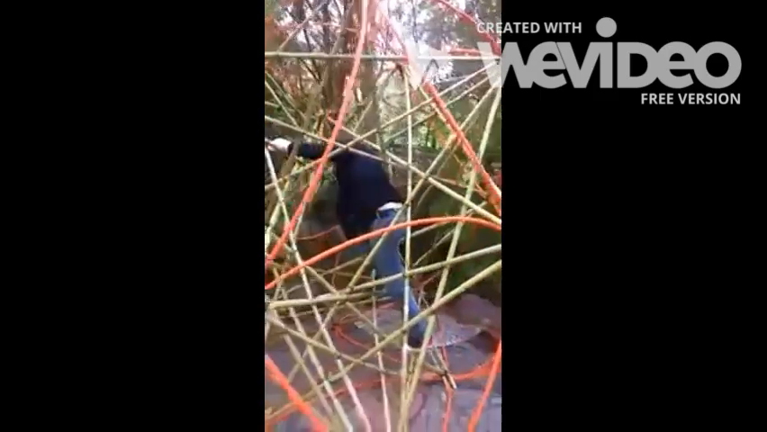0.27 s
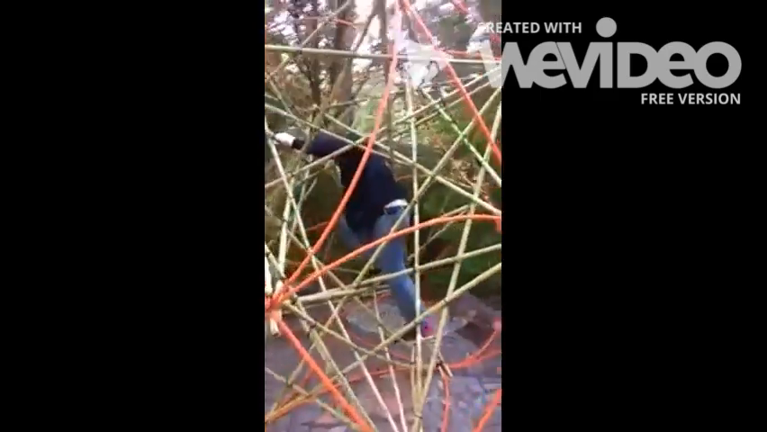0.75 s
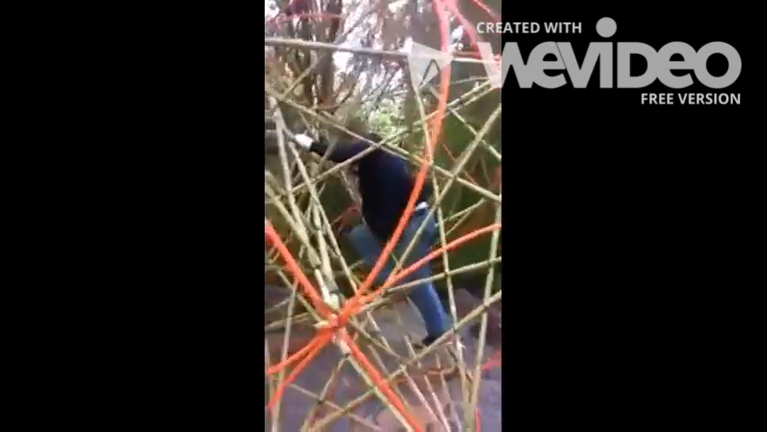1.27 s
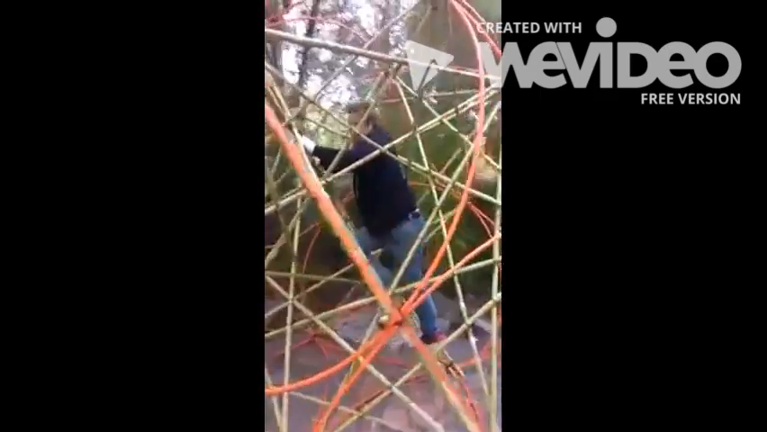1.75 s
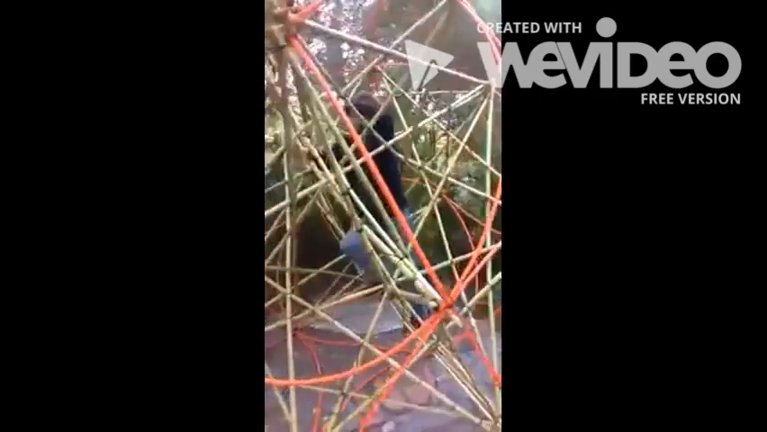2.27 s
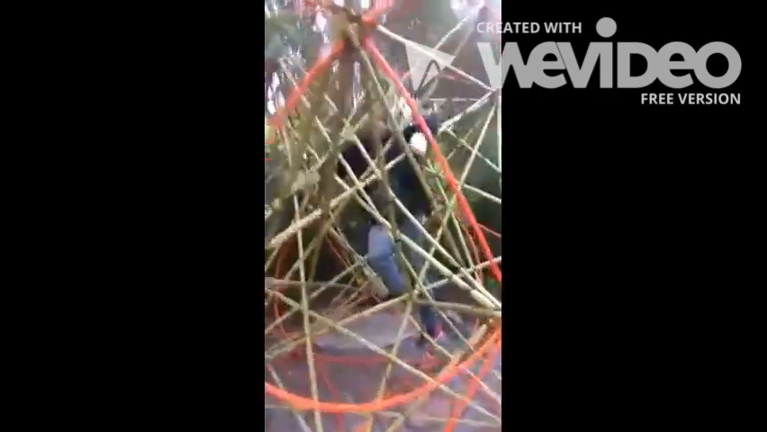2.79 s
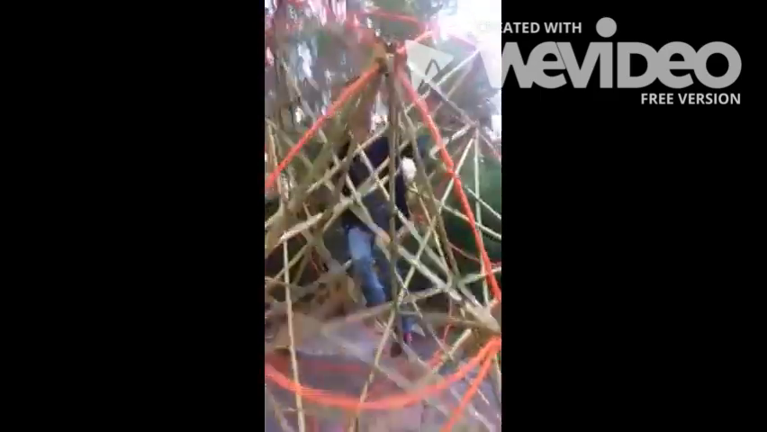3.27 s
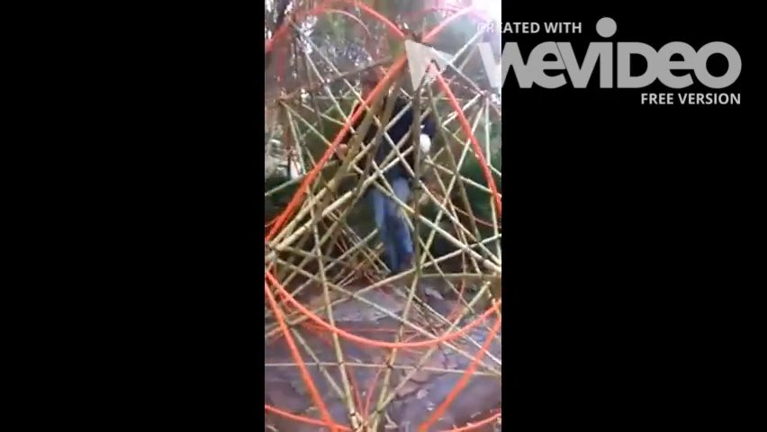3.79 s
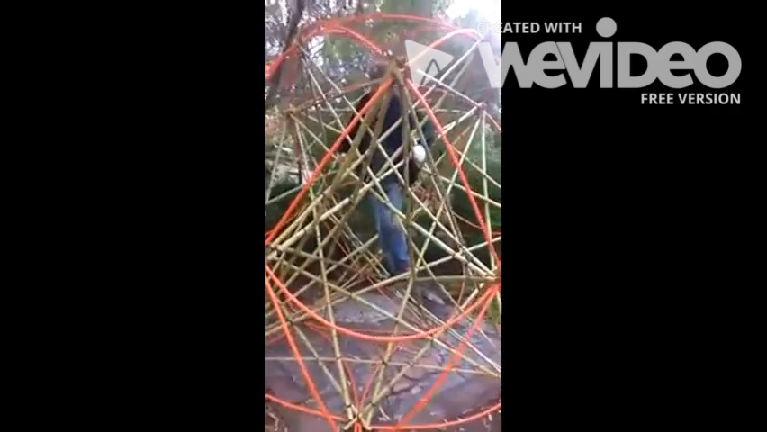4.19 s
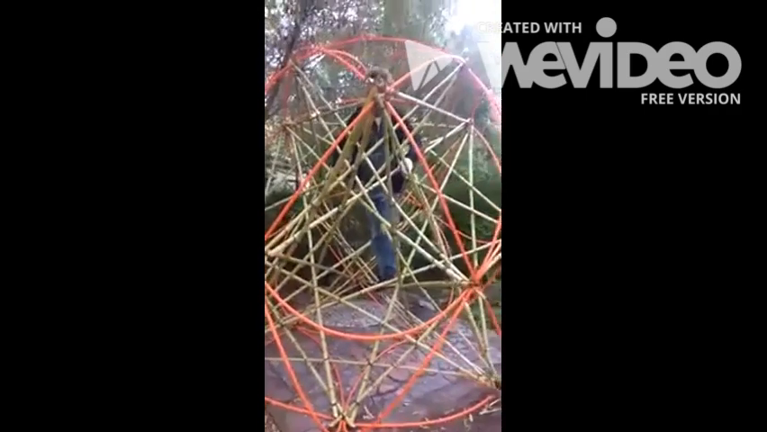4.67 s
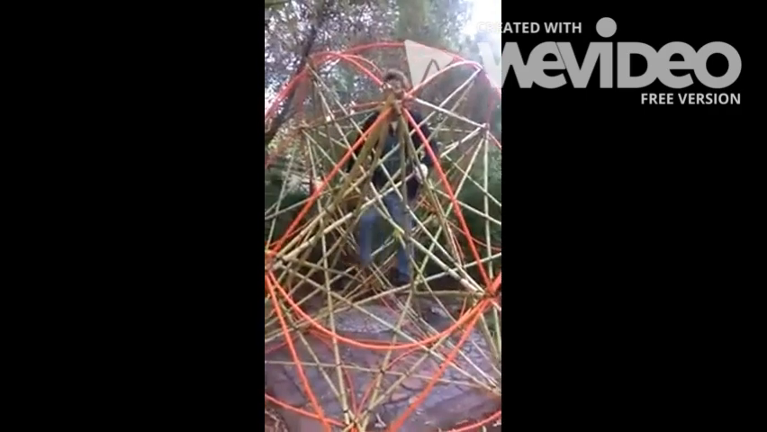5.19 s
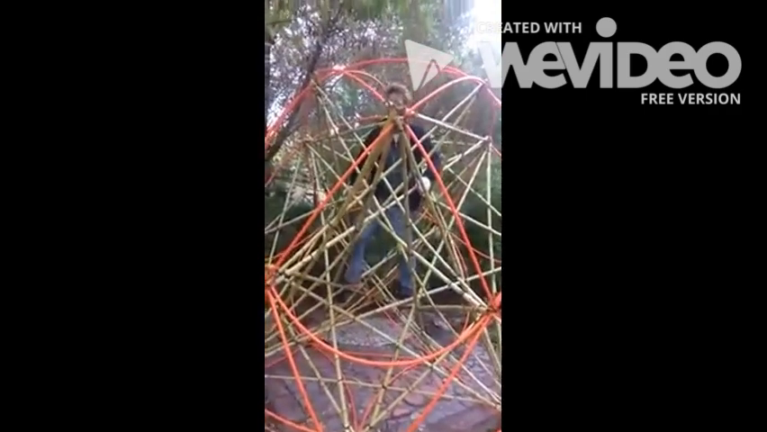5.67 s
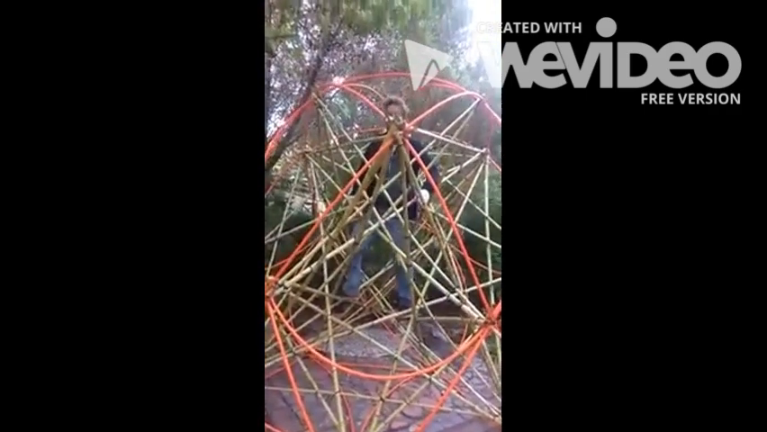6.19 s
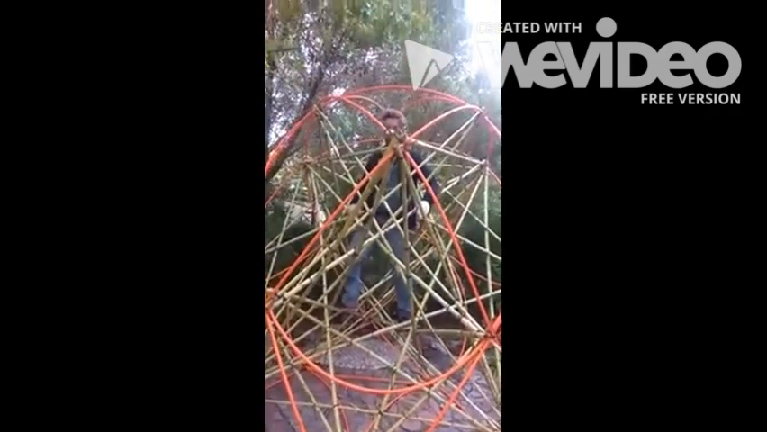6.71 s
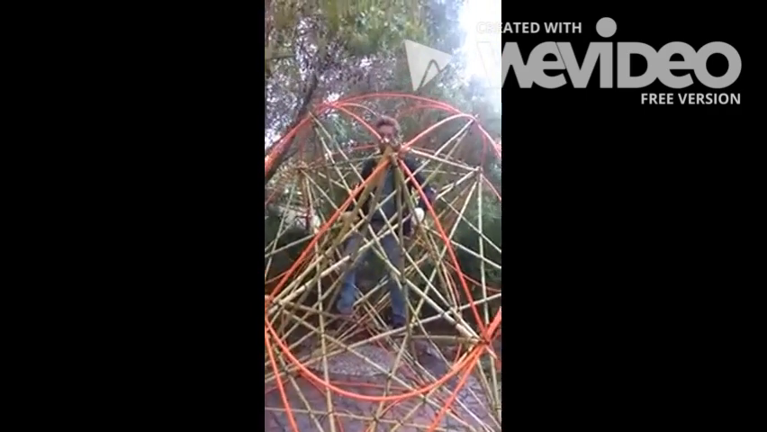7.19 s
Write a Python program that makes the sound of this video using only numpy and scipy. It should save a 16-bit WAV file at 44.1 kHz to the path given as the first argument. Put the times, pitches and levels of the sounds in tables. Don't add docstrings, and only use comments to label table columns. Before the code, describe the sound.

Hollow bamboo poles tick, crack and rattle in irregular sharp knocks outdoors, over steady traffic roar and faint leaf rustle.

```python
import sys
import numpy as np
from scipy import signal
from scipy.fft import rfft, irfft, next_fast_len
from scipy.io import wavfile
from scipy.ndimage import uniform_filter1d

SR = 44100
rng = np.random.default_rng(int(sys.argv[2]) if len(sys.argv) > 2 else 0)


def wav_out(sig):
    wavfile.write(sys.argv[1], SR, np.round(np.clip(np.atleast_2d(sig).T, -1, 1) * 32767).astype(np.int16))


def magnitude_from_level(level_db):
    exponent = np.asarray(level_db, float) / 20
    return 10 ** exponent


N = 328390

# start_s, nearness_db
TRAFFIC = [(0, -35), (.5, -30), (1, -32.5), (1.5, -35), (2, -30.5), (2.5, -30), (3, -32.5), (4, -31.5),
           (4.5, -32), (5, -32.5), (5.5, -31.5), (6, -31), (6.5, -30), (6.9, -28), (7.2, -28.5),
           (7.45, -27)]
# freq_hz, density_db (per Hz)
TYRE_ROAR = [(22, -15), (35, -15), (60, -4), (100, -1.5), (200, -5.5), (500, -5.5), (1000, -1), (1500, -6),
             (2200, -16.5), (3200, -20.5), (5000, -33.5), (8000, -42.5), (15000, -51.5)]
# freq_hz, density_db (per Hz)
LEAF_HISS = [(2000, -14.5), (4000, 0.5), (6000, 0.5), (9000, -4.5), (12000, -11.5), (15200, -17.5),
             (16500, -38)]
# peak_s, level_db, half_length_s
BRUSHES = [(.25, -63, 0.28), (1.1, -75, 0.14), (2.07, -60, 0.065), (3.227, -52, 0.077), (3.836, -68, 0.031),
           (4.038, -56, 0.16), (4.686, -57, 0.079), (4.887, -39, 0.034), (5.547, -79, 0.17),
           (5.93, -73, .12), (7.45, -68, .15)]
# start_s, peak_db, crack_hz, left_minus_right_db
TICKS = [(0.122, -30.5, 4070, 1), (0.1845, -38, 3410, 6.5), (0.565, -42, 4400, 6), (0.6708, -40.5, 3940, 4),
         (0.8658, -36, 3430, 1), (0.9554, -33, 4210, 5), (0.9672, -35, 3930, -2), (1.271, -30, 3670, 1),
         (1.3075, -35, 6230, 6), (1.3371, -37.5, 6200, 5), (1.922, -36.5, 3500, 9), (2.8918, -34, 3580, -1),
         (3.1527, -33.5, 3380, 3), (3.42, -36, 3260, 0), (3.8335, -44, 3550, 0), (4.0454, -32, 3300, -2.5),
         (4.879, -29.5, 3600, -1), (4.9635, -41, 3260, -1.5), (5.5178, -41, 3430, -2)]
# start_s, peak_db, crack_hz, crack_t60_s, rattle_s
KNOCKS = [
    (0.2925, -39, 5000, 0.0055, .003),
    (0.3079, -22, 4200, 0.011, 0.0054),
    (0.3575, -13, 3960, 0.0033, 0.00411),
    (1.1, -46, 7500, 0.0068, 0.008),
    (2.4708, -35, 2220, 0.01, .002),
    (3.1797, -5.5, 3300, 0.0057, .0009),
    (3.813, -37, 9030, .02, 0.007),
    (4.8265, -1, 3360, 0.0031, 0.00047),
    (5.7309, -8.5, 3050, 0.0077, 0.013),
    (4.4194, -26.5, 3980, 0.016, 0.0034),
]
# multiple_of_crack_pitch, level_db
WALL_MODES = [(.48, -3.5), (.72, -6), (.87, -6), (0.999, 4), (1.141, 3.5), (1.321, -4.5), (1.6, -6),
              (1.95, -10), (2.4, -30.5), (3.2, -15.5)]
# freq_hz, level_db
SCATTER_COLOUR = [(500, -14), (1500, -8), (3000, 0), (5000, -4.5), (7000, -8.5), (9000, -16.5),
                  (15000, -29), (16500, -60)]
# freq_hz, level_db, t60_s
LOOSE_POLE = [(1435, -27, 0.29), (1700, -15, 0.034), (2200, -6, 0.043), (2760, -4, 0.16), (3430, -15, 0.44),
              (3930, -10.5, 0.051), (4540, -24, 0.21), (5370, -14, 0.41), (6758, -7, 0.052),
              (7171, -35, 0.033), (7900, -24, 0.193), (8080, -19, 0.27)]
# start_s, peak_db, pitch_hz, t60_s,
# left_minus_right_db
HOLLOWS = [(.309, -27, 6500, .012, 0), (0.3085, -21, 4330, .02, 2), (0.31, -25, 1140, .02, 0),
           (.3578, -17, 6450, .012, 5), (.3615, -17, 6860, .01, 2), (.3615, -19, 1080, .02, 0),
           (2.4708, -23, 2100, .015, 3), (3.1797, -20, 2480, 0.02, 4), (3.1797, -10, 3540, .008, -6),
           (4.8265, -4.5, 1840, 0.0071, -6), (4.8268, -10, 3350, .005, -7), (5.7318, -19, 2070, .06, -4),
           (5.733, -18, 2420, .05, -2), (5.736, -23, 6620, .08, 2), (5.738, -30, 6450, .1, 0)]
# start_s, throttle_db
ENGINE = [
    (5.85, -49),
    (6.3, -50),
    (6.7, -49),
    (6.93, -46),
    (7.15, -47.5),
    (7.446, -42),
]
# start_s, depth_db
DUCKS = [
    (0.368, 7.5),
    (3.186, 7.5),
    (4.831, 13),
    (5.746, 12),
]
# freq_hz, likeness (-1 to 1), left_minus_right_db
MIC_PAIR = [(30, 0.21, 1.5), (128, 0.68, -0.9), (610, 0.96, -6), (1740, 0.97, 0), (2970, 0.85, -5),
            (5000, 0.83, 0), (8000, 0.68, -0.5), (11800, -0.15, -10)]
# freq_hz, threshold_db (against the band level)
TONE_FLOOR = [(1500, -29), (2500, -17), (4500, -6.5), (7500, -16), (11000, -3.5), (15000, -10)]

TIME, SIZE = np.arange(N) / SR, next_fast_len(N)
HZ = np.maximum(np.fft.rfftfreq(SIZE, 1 / SR), 1)

USUAL_DB, BASS_HOLD, TREBLE_HOLD, TREBLE_DB = -31, 0.78, 0.75, 1.03
STIR_DB = -62
TICK_T60_S, TICK_RATTLE_S = 0.0064, 0.0009
CONTACT_S, SNAP_DB = 0.0003, 0.5
SCATTER_DB, WETTER_DB_PER_DB, WETTER_DB_PER_S = -25, 0.2706, 848
SCATTER_T60_S, LATE_DB, LATE_T60_S = 0.024, -2, 0.34
RING_DB, RING_ROUGH_DB, RING_WOBBLE_HZ = -16.5, 4, 70
FIRING_HZ, SECOND_DB = 79.8, -1.5
DUCK_S, RECOVER_DB_PER_S = 0.031, 9.5
FRAME, GRID, TOP_HZ = 1024, 1006, 15300
PATCHY_DB, WEAK_DB, WEAK_FROM_HZ, FLICKER_HZ_PER_DB = 7.5, -6, 2800, 2800

IN_STEP_HZ, NOTCH_HZ, SPACING_HZ, WIDER_FROM_HZ, WIDER = 1574, 2480, 2500, 11000, 0.22
LOW_TURNS = np.clip((HZ - IN_STEP_HZ) / (NOTCH_HZ - IN_STEP_HZ), 0, 1) / 2
HIGH_TURNS = 0.5 + (HZ - NOTCH_HZ - WIDER * np.maximum(HZ - WIDER_FROM_HZ, 0)) / SPACING_HZ
LAG_TURNS = np.where(HZ < NOTCH_HZ, LOW_TURNS, HIGH_TURNS)


def on_log_hz(table, hz, column=1):
    table = np.array(table)
    return np.interp(np.log(hz), np.log(table[:, 0]), table[:, column])


def on_time(table):
    table = np.array(table)
    return np.interp(TIME, table[:, 0], table[:, 1])


def walk(rate):
    hold = int(SR / rate)
    steps = np.repeat(rng.standard_normal(N // hold + 1), hold)
    return 1.47 * uniform_filter1d(uniform_filter1d(steps, hold), hold)[:N]


def surround(spectrum, mid, side):
    like = np.clip(on_log_hz(MIC_PAIR, HZ), -1, 1) * np.cos(2 * np.pi * LAG_TURNS)
    agree = rfft(mid, SIZE) * np.sqrt(1 + like)
    oppose = rfft(side, SIZE) * np.sqrt(1 - like)
    lean = magnitude_from_level(on_log_hz(MIC_PAIR, HZ, column=2) / 2)
    pair = np.array([(agree + oppose) * lean, (agree - oppose) / lean])
    pair = pair * magnitude_from_level(on_log_hz(spectrum, HZ))
    return pair / np.sqrt(np.mean(np.abs(pair) ** 2) / N)


def from_left(left, right):
    pair = rfft(np.array([left, right]), SIZE) * np.clip((16200 - HZ) / 3000, 0, 1)
    pair[1] *= np.exp(-2j * np.pi * LAG_TURNS)
    return irfft(pair, SIZE)[:, :N]


def panned(pan_db):
    return magnitude_from_level(np.array([[pan_db], [-pan_db]]) / 2)


def road():
    pair = surround(TYRE_ROAR, *rng.standard_normal((2, N)))
    nearness = on_time(TRAFFIC)
    swell = nearness - USUAL_DB
    out = 0
    for hz in 32 * 4.1 ** np.arange(5):
        share = np.clip(1 - np.abs(np.log2(np.minimum(HZ, 8192) / hz)) / 2, 0, 1)
        tilt = -BASS_HOLD * swell * (hz < 300) + (TREBLE_DB - TREBLE_HOLD * swell) * (hz > 1500)
        flicker = 0.5 * walk(2.57) + 0.5 * walk(12)
        out = out + irfft(pair * share, SIZE)[:, :N] * magnitude_from_level(tilt + flicker)
    return out * magnitude_from_level(nearness)


def rustle():
    clicks = (rng.random(N) < 0.01) * magnitude_from_level(2.5 * rng.exponential(size=N))
    grains = rng.standard_normal((2, N)) * (1 + 0.86 * clicks)
    effort = magnitude_from_level(STIR_DB)
    for s, db, half_s in BRUSHES:
        effort = effort + magnitude_from_level(db) * np.exp(-((TIME - s) / half_s) ** 2)
    return irfft(surround(LEAF_HISS, *grains), SIZE)[:, :N] * effort * magnitude_from_level(3.0 + 2.0 * walk(25))


def crack(hz, t60, rattle_s):
    contacts = np.zeros(int(0.03 * SR))
    when, size = rng.random((2, 16))
    landed = np.arange(16) + 1 < rattle_s / 0.001
    at = (when ** 0.8 * np.clip(rattle_s, 0, 0.029) * SR).astype(int)
    contacts[at] = landed * np.sign(size - 0.5) * (0.42 + 0.98 * size)
    contacts[0] = 1
    t = np.arange(2048) / SR
    ring = 0
    for multiple, db in WALL_MODES:
        detune = 1 + 0.01 * rng.standard_normal()
        mode_hz = min(multiple * hz * detune, 0.34 * SR)
        ring = ring + magnitude_from_level(db) * np.sin(2 * np.pi * mode_hz * t) * magnitude_from_level(-60 * t / t60)
    ring = -ring * (1 - np.exp(-t / CONTACT_S))
    snap = magnitude_from_level(SNAP_DB - 1800 * min(t60, 0.01)) * np.abs(ring).max()
    ring[8:13] += snap * np.array([-0.6, 0.1, 1, 0.1, -0.6])
    blow = signal.fftconvolve(contacts, ring)
    return blow / np.abs(blow).max()


def scatter(t, hz, rattle_s, db):
    f = np.maximum(np.fft.rfftfreq(len(t), 1 / SR), 1) * (3300 / hz) ** 0.42
    hiss = irfft(rfft(rng.standard_normal((2, len(t)))) * magnitude_from_level(on_log_hz(SCATTER_COLOUR, f)), len(t))
    hiss = (hiss + 0.31 * hiss[::-1]) / hiss.std()
    fade = magnitude_from_level(-60 * t / SCATTER_T60_S) + magnitude_from_level(LATE_DB - 60 * t / LATE_T60_S)
    return hiss * magnitude_from_level(db) * fade * np.clip(t / (0.00067 + rattle_s), 0, 1)


def loose_pole(t, rattle_s):
    ring = 0
    for mode_hz, db, t60 in LOOSE_POLE:
        level = magnitude_from_level(db - 60 * t / t60 + RING_ROUGH_DB * walk(130)[:len(t)])
        turns = np.cumsum(mode_hz + RING_WOBBLE_HZ * walk(110)[:len(t)]) / SR
        ring = ring + level * np.sin(2 * np.pi * turns)
    return magnitude_from_level(RING_DB + 9.5) * np.clip(t / rattle_s, 0, 1) * ring


def strike(db, hz, t60, rattle_s, scatter_db):
    t = np.arange(2 ** 14) / SR
    sound = scatter(t, hz, rattle_s, scatter_db)
    blow = crack(hz, t60, rattle_s)
    sound[:, :len(blow)] += blow
    if rattle_s > 0.012:
        sound += loose_pole(t, rattle_s)
    return magnitude_from_level(db) * sound


def poles(gain_db):
    out = np.zeros((2, N + SR))
    blows = [(*knock, 0) for knock in KNOCKS]
    blows += [(s, db + 4.0, hz, TICK_T60_S, TICK_RATTLE_S, pan_db) for s, db, hz, pan_db in TICKS]
    for s, db, hz, t60, rattle_s, pan_db in blows:
        i = int(s * SR)
        scatter_db = SCATTER_DB - WETTER_DB_PER_DB * db + WETTER_DB_PER_S * rattle_s
        sound = strike(db - gain_db[i], hz, t60, rattle_s, scatter_db)
        out[:, i:i + sound.shape[1]] += sound * panned(pan_db)
    return from_left(*out[:, :N])


def hollows(gain_db):
    out, t = np.zeros((2, N + SR)), np.arange(4096) / SR
    onset = 1 - np.exp(-t / CONTACT_S)
    for s, db, hz, t60, pan_db in HOLLOWS:
        i = int(s * SR)
        ring = -np.sin(2 * np.pi * hz * t) * magnitude_from_level(db - gain_db[i] - 60 * t / t60) * onset
        out[:, i:i + len(t)] += ring * panned(pan_db)
    return from_left(*out[:, :N])


def engine():
    turns = np.cumsum(FIRING_HZ * (1 + 0.02475 * walk(9))) / SR
    second = magnitude_from_level(SECOND_DB + 1.7 * walk(5.7)) * np.sin(4 * np.pi * turns)
    hum = np.sin(2 * np.pi * turns) + second
    fade_in = np.clip((TIME - ENGINE[0][0]) / 0.1, 0, 1)
    return np.sqrt(2) * hum * magnitude_from_level(on_time(ENGINE) + 1.7 * walk(8)) * fade_in


def recorder_gain_db():
    dips = []
    for s, depth_db in DUCKS:
        since = TIME - s
        dips.append(np.clip(since / DUCK_S, 0, 1) * depth_db - RECOVER_DB_PER_S * np.abs(since))
    return -np.maximum(np.max(dips, axis=0), 0)


def scene():
    gain_db = recorder_gain_db()
    return road() + rustle() + poles(gain_db) + hollows(gain_db) + engine()


def thin_weak_tones(x):
    n, k = np.arange(2 * FRAME) + 0.5, np.arange(FRAME) + 0.5
    window = np.sin(np.pi * n / (2 * FRAME))
    basis = np.cos(np.pi / FRAME * np.outer(n + FRAME / 2, k)) * window[:, None]
    count, lead = N // FRAME + 3, 2 * FRAME - GRID
    tail = (count + 1) * FRAME - N - lead
    pair = np.pad([x[0] + x[1], x[0] - x[1]], ((0, 0), (lead, tail)))
    halves = pair.reshape(2, -1, FRAME)
    lines = np.concatenate([halves[:, :-1], halves[:, 1:]], axis=2) @ basis
    hz = k * SR / (2 * FRAME)
    power = np.mean(lines.reshape(2, count, -1, 16) ** 2, axis=3)
    power = uniform_filter1d(power, size=3, axis=1)
    level = np.sqrt(np.repeat(power.mean(axis=0), 16, axis=1))
    flicker = hz[::16] / FLICKER_HZ_PER_DB * rng.standard_normal(power.shape)
    margin = magnitude_from_level(2 * (WEAK_DB + flicker))
    kept = np.repeat(power > margin * power[::-1], 16, axis=2) | (hz < WEAK_FROM_HZ)
    patchy = np.repeat(magnitude_from_level(PATCHY_DB * rng.standard_normal((2, count, FRAME // 8))), 8, axis=2)
    threshold = patchy * level * magnitude_from_level(on_log_hz(TONE_FLOOR, hz))
    lines = lines * (np.abs(lines) > threshold) * kept * (hz < TOP_HZ)
    frames = lines @ basis.T / FRAME
    joined = (frames[:, 1:, :FRAME] + frames[:, :-1, FRAME:]).reshape(2, -1)
    mid, side = joined[:, lead - FRAME:lead - FRAME + N]
    return np.array([mid + side, mid - side])


def low_pass(x):
    return signal.sosfilt(signal.butter(12, 16300, fs=SR, output="sos"), x)


def record(dry):
    heard = dry * magnitude_from_level(recorder_gain_db())
    sharp = sum(np.clip(2 - np.abs(TIME - s - 0.012) / 0.01, 0, 1) for s, db, *_ in KNOCKS if db > -16)
    mix = thin_weak_tones(heard * (1 - sharp)) + heard * sharp
    return low_pass(np.clip(mix, -1, 1))


dry = scene()
out = record(dry)
wav_out(out)
```